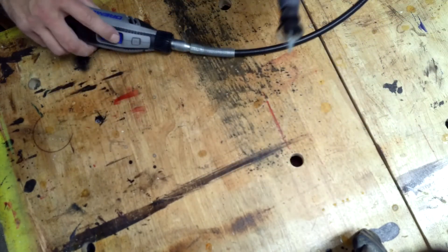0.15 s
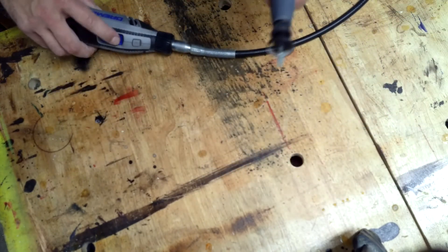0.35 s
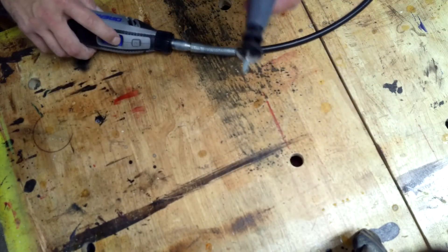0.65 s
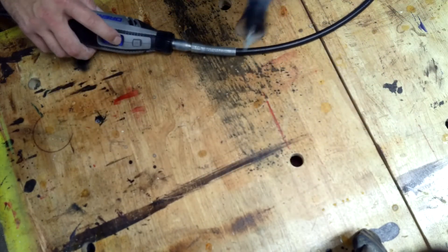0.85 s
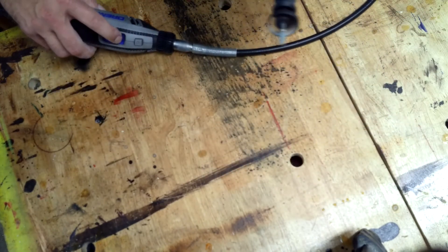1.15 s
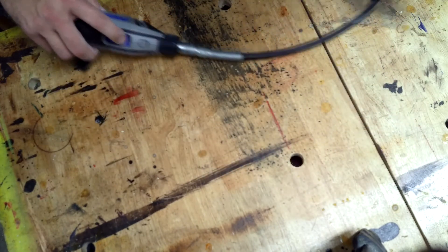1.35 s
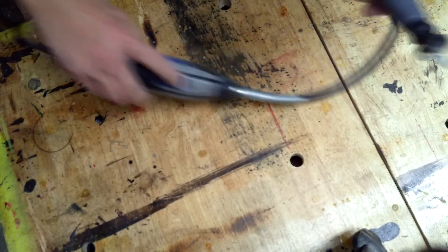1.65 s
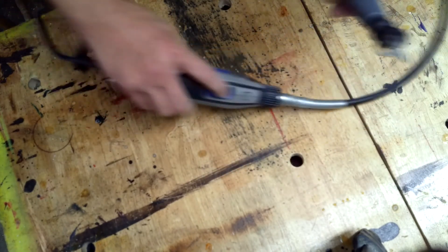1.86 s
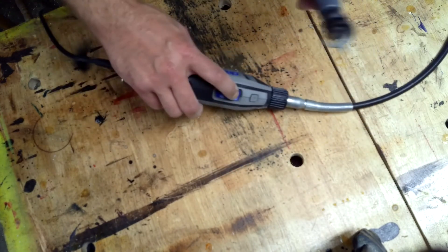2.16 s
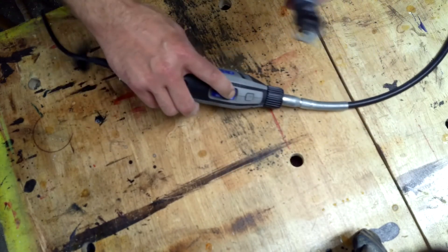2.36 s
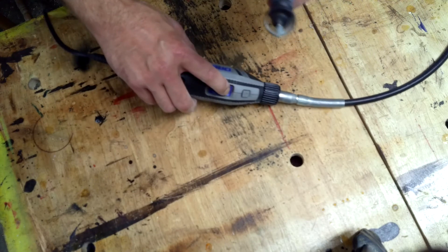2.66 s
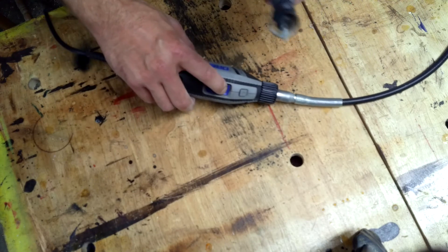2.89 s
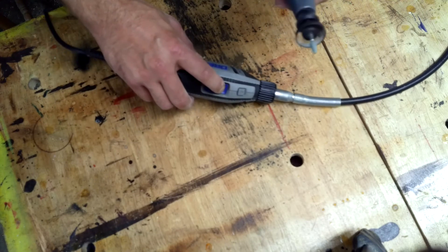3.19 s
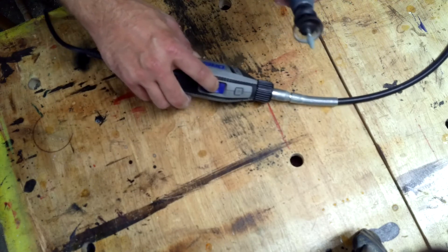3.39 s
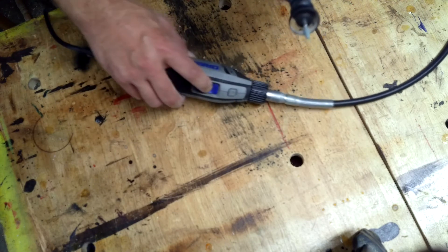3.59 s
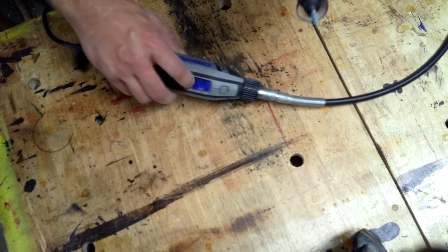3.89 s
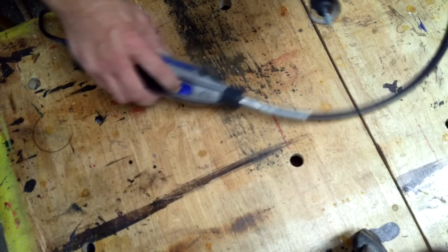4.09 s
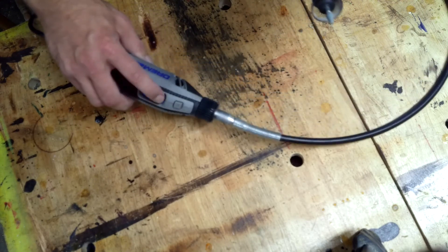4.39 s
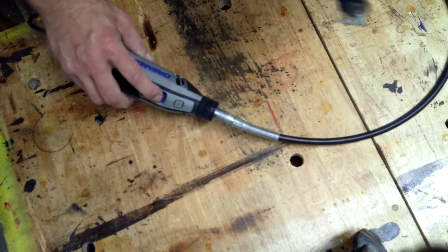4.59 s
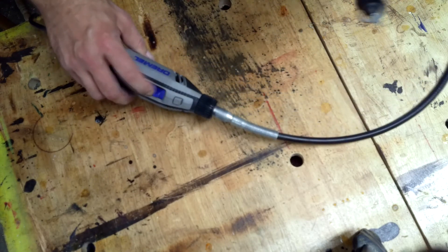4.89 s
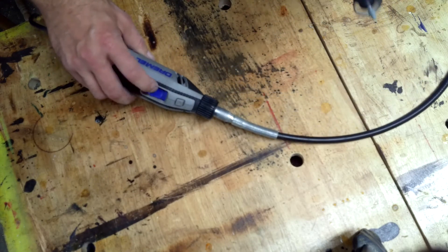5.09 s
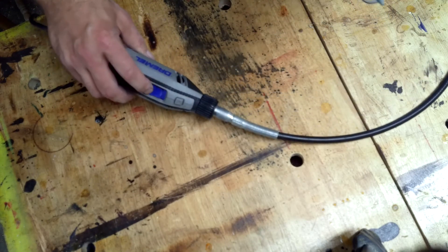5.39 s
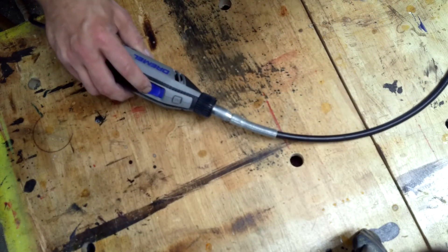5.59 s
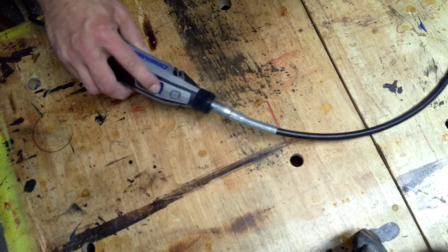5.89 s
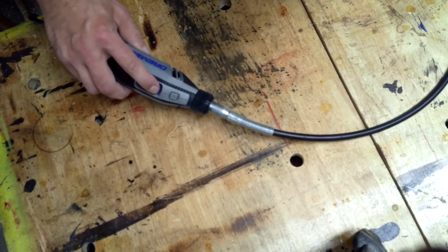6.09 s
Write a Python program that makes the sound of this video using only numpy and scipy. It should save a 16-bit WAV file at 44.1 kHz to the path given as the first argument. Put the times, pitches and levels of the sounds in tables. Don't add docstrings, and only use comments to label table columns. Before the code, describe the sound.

Close up in a small workshop, a little electric rotary tool spins up to a high, buzzing, hissing whine and holds steady. A sharp switch snap cuts it and the pitch slides down. A softer click restarts it for half a second, another snap lets it coast lower, and a last click sends it climbing to full speed again.

```python
import sys
import numpy as np
from scipy import signal
from scipy.fft import rfft, irfft
from scipy.io import wavfile
from scipy.ndimage import uniform_filter1d

SR = 44100
rng = np.random.default_rng(int(sys.argv[2]) if len(sys.argv) > 2 else 0)


def materialize(psi):
    bounded = np.clip(np.atleast_2d(psi).T, -1, 1)
    quanta = np.round(bounded * 32767).astype(np.int16)
    wavfile.write(sys.argv[1], SR, quanta)


def nominal_scale(level):
    x = np.asarray(level, float) / 20
    return 10 ** x


N = 275625
TIME = np.arange(N) / SR
FULL_HZ = 372


def rms_one(x):
    return x / np.sqrt(np.mean(x ** 2) + 1e-20)


def in_time(rows):
    s, *columns = np.transpose(rows)
    return [np.interp(TIME, s, column) for column in columns]


def at_hz(points, hz):
    point_hz, point_db = np.transpose(points)
    return np.interp(np.log(hz), np.log(point_hz), point_db)


def drift(rate_hz):
    r = np.exp(-80 * np.pi * rate_hz / SR)
    draws = rng.standard_normal(N // 40 + 2002)
    slow = signal.lfilter([1], [1, -2 * r, r * r], draws)[2000:]
    return np.interp(np.arange(N) / 40, np.arange(len(slow)), rms_one(slow))


def peak(x, hz, width_hz, db):
    r = np.exp(-np.pi * width_hz / SR)
    band_gain = (1 - r * r) / 2 * np.array([1, 0, -1])
    band = signal.lfilter(band_gain, [1, -2 * r * np.cos(2 * np.pi * hz / SR), r * r], x)
    return x + (nominal_scale(db) - 1) * band


# first_from_s, first_to_s, second_from_s, second_to_s
MOVES = (1.55, 1.9, 3.9, 4.3)


def posed(levels):
    one, two, three = levels
    return np.interp(TIME, MOVES, [one, two, two, three])


# on_s, pull_up_s, peak_hz, settled_hz, off_s (hz = shaft turns per second)
RUNS = [
    (-.22, .55, 385, 372.1, 3.32),
    (4.135, .427, 380.5, 377.5, 4.71),
    (5.726, .467, 380.5, 378, 6.3),
]
PULL_UP = [(0, 0), (.1, .033), (.2, .13), (.35, .33), (.5, .55), (.65, .755), (.78, .9), (.885, .987),
           (1, 1)]


def shaft_speed():
    friction_hz_per_s, drag_per_s = 150, .55
    settle_s, swing_s = .16, 1.0
    speed, rest_hz = np.zeros(N), friction_hz_per_s / drag_per_s
    for on_s, pull_s, peak_hz, settled_hz, off_s in RUNS:
        left_hz = np.interp(on_s, TIME, speed)
        gained = np.interp((TIME - on_s) / pull_s, *np.transpose(PULL_UP))
        rising = left_hz + (peak_hz - left_hz) * gained
        held_s = np.maximum(TIME - on_s - pull_s, 0)
        overshoot = np.exp(-held_s / settle_s) * np.cos(2 * np.pi * held_s / swing_s)
        driven = rising - (peak_hz - settled_hz) * (1 - overshoot)
        off_hz = np.interp(off_s, TIME, driven)
        coasting = (off_hz + rest_hz) * np.exp(-drag_per_s * (TIME - off_s)) - rest_hz
        speed = np.where(TIME < on_s, speed, np.where(TIME < off_s, driven, coasting))
    return uniform_filter1d(speed, size=900, mode="nearest")


def states(speed):
    slope = np.gradient(speed) * SR
    pulling = uniform_filter1d((slope > 100) * 1., size=1500)
    coasting = uniform_filter1d((slope < -100) * 1., size=1500)
    return pulling, coasting, np.interp(speed, (355, 367), [0, 1])


# start_s, stop_s
THROBBING = [
    (0, 3.32),
    (4.14, 4.4),
    (5.69, 6.3),
]


def current(speed):
    pulse_hz, lead_turns = 120, .07
    on = sum((TIME > start) & (TIME < stop) for start, stop in THROBBING)
    on = uniform_filter1d(on * 1., size=200)
    sharpness = on * (1.24 + 1.0 * (1 - speed / speed.max()))
    lumps = np.exp(sharpness * np.cos(2 * np.pi * (pulse_hz * TIME + lead_turns)))
    return lumps / np.i0(sharpness)


def shaft_angle(speed):
    hunted_hz = speed + .25 * drift(1.5)
    return 2 * np.pi * np.cumsum(hunted_hz) / SR + .028 * drift(14)


def tone(angle, order, waver_db):
    phase = rng.uniform(0, 2 * np.pi)
    return np.sqrt(2) * nominal_scale(waver_db * drift(18.5)) * np.sin(order * angle + phase)


# multiple, loss_when_coasting_db, then trim at full speed pose1_db, pose2_db, pose3_db
WHINE_LAW = [
    (5, -4, -0.2, -0.2, 0.5),
    (8, 15, -10, -2.5, -2.5),
    (10, -4, -0.5, -6, 8.5),
    (16, 11, -3, -2, 0.5),
    (24, 10, 3.5, -1.5, 4.5),
    (26, -9, -1, 2.5, -12),
    (3, 4, -19, -3.5, -19),
]
# pose1_db, pose2_db, pose3_db, coasting_loss_db per halving of speed
GLIDE_TRIM_DB = [
    (1.7, -2.5, -2.5, 5.5),
    (3, 4, 1, .1),
    (.1, 0.5, -2, 3.5),
    (-3, 10, -2, 32),
    (-9, -16, -4, 1),
    (3, -1.3, -4, 1),
    (-2, 7, 8, -6),
]
# pitch_hz, level_db
WHINE_COLOUR = [
    [(650, -59), (850, -43), (1100, -38), (1350, -29.5), (1520, -23.5), (1620, -30.5), (1740, -21),
     (1860, -32)],
    [(1400, -52), (1800, -40), (2050, -42.5), (2250, -31.5), (2450, -30.5), (2700, -35), (2850, -33),
     (2980, -33.5)],
    [(1200, -56), (1600, -36), (2000, -59), (2500, -42), (2900, -48), (3150, -31), (3450, -39),
     (3720, -41.5)],
    [(1800, -46), (2500, -35), (2750, -36), (3350, -35), (3900, -30.5), (4500, -34), (5200, -45),
     (5800, -37)],
    [(2600, -43), (3700, -38), (4300, -26), (5500, -71), (7000, -27), (8000, -50), (8930, -41.5)],
    [(3000, -64), (4500, -60), (6000, -52), (8000, -45), (9670, -40)],
    [(500, -81), (900, -86), (1115, -39.5)],
]
# time_s, bearing_load_db, bent_shaft_hum_db, vents_uncovered_db
HANDLING = [(.28, .1, -72, 5), (.38, 4.5, -52, 1.5), (.52, 2, -47.5, 2), (.82, 5, -47.5, -6),
            (1.3, 6.5, -50.5, 11), (1.48, -3.5, -54, -10), (1.7, 5.5, -57.5, -12), (1.92, -3.5, -54, 1.5),
            (2.15, -9, -60, -0.5), (2.36, -3.5, -52.5, 0), (2.6, -9, -62, -0.5), (2.85, -11, -58, 3.5),
            (3.3, -4, -62, 4.5), (4.55, -6, -47, -2.5), (4.68, -0.5, -46, 0), (6.12, -8, -51, -4),
            (6.2, -1, -43, 1)]


def whine_levels(speed):
    _, coasting, running = states(speed)
    load_db, _, vents_db = in_time(HANDLING)
    hand_db = {5: load_db, 8: vents_db}
    for law, glide, colour in zip(WHINE_LAW, GLIDE_TRIM_DB, WHINE_COLOUR):
        order, coast_db, *trim_db = law
        *glide_db, fade_db = glide
        order = round(order)
        steady_db = posed(trim_db) + hand_db.get(order, 0)
        gliding_db = posed(glide_db) + 2.2 * drift(13.5) * coasting
        lost_db = (coast_db + fade_db * np.log2(FULL_HZ / speed)) * coasting
        trimmed_db = running * steady_db + (1 - running) * gliding_db
        yield order, at_hz(colour, order * speed) - lost_db + trimmed_db


def shaft_hum(speed, angle):
    hum_db = in_time(HANDLING)[1] - 22 * (1 - states(speed)[2])
    return nominal_scale(hum_db) * tone(angle, order=1, waver_db=2.3)


# pose1_db, pose2_db, pose3_db
FAN_COAST_DB = (.1, .1, -4)


def whines(speed, angle, roar_db, lumps):
    slack = 1 - speed / speed.max()
    pulled = uniform_filter1d((np.gradient(speed) > 0) * 1., size=800)
    throb_depth = {8: .9, 16: .2 + slack, 24: 1.2 * slack}
    out = np.zeros(N)
    for order, level_db in whine_levels(speed):
        if order == 26:
            fan_db = roar_db + posed(FAN_COAST_DB) - 19 + 30 * np.minimum(slack, .3)
            fan_db = fan_db - 60 * np.maximum(slack - .48, 0) - 14 * pulled
            level_db = np.maximum(level_db, fan_db)
        line = nominal_scale(level_db) * lumps ** throb_depth.get(order, 0) * tone(angle, order, waver_db=2.2)
        if order in throb_depth:
            line = peak(peak(line, 2620, 400, 8), 3150, 300, -13)
        out = out + line
    return out


# pitch_hz, level_db
SLOT_COLOUR = [(2500, -56), (3200, -53), (3800, -38), (4500, -36), (5200, -67), (9000, -44), (12000, -47)]
# pose1_db, pose2_db, pose3_db
BUZZ_DB = (-29, -40, -50)


def slot_buzz(speed, angle, lumps):
    slack = 1 - speed / speed.max()
    drive = np.clip(uniform_filter1d(np.abs(lumps - 1), size=2000), .12, 1) * lumps ** slack
    top = nominal_scale(at_hz(SLOT_COLOUR, 32 * speed)) * drive * tone(angle, order=32, waver_db=0.5)
    buzz = nominal_scale(posed(BUZZ_DB)) * states(speed)[2] * (lumps - 1) * tone(angle, order=8, waver_db=0.0)
    ring = peak(buzz, 2720, 560, 4.83) - buzz
    return top + 2 * ring


FAINT_ORDERS = (3, 4.08, 6, 6.9, 7, 9, 10.92, 12, 13, 14, 15, 17, 20, 23, 29)
FAINT = [-23.5, -21.5, -23, -18.5, -19, -18, -24.5, -21, -24.5, -20, -24, -23, -23.5, -20, -24]
# pitch_hz, level_db per Hz
AIR = [(15, -52), (25, -25), (55, -25.5), (253, -23), (368, -22), (410, -19), (522, -12.5), (848, -10),
       (1140, -10.5), (1620, -8), (2920, -2.5), (4150, -5.5), (5880, -5.5), (9540, -9), (15500, -24.5)]


def faint_tones(speed, angle, roar_db):
    out, coasting = np.zeros(N), states(speed)[1]
    for order, level_db in zip(FAINT_ORDERS, FAINT):
        radiated_db = at_hz(AIR, order * speed) - at_hz(AIR, order * speed.max())
        level_db = roar_db + level_db + np.minimum(radiated_db, 9) + 0.5 * coasting + 0.33 * drift(8.6)
        out = out + nominal_scale(level_db) * tone(angle, order, waver_db=4.5)
    return out


def tones(speed, roar_db, lumps):
    angle = shaft_angle(speed)
    out = shaft_hum(speed, angle) + whines(speed, angle, roar_db, lumps)
    return out + slot_buzz(speed, angle, lumps) + faint_tones(speed, angle, roar_db)


# pose1_db, pose2_db, pose3_db
NOISE_DB = [
    (-31.5, -29, -27),
    (-24, -24, -23),
    (-23.5, -22.5, -23),
    (-36.5, -36.5, -38),
]
# loss_db per halving of speed, pull_up_gain_db, floor_db
NOISE_LAW = [
    (12.5, 0, -38.5),
    (10.5, 0.5, -42),
    (12, 0.2, -39),
    (9, 2.5, -72),
]


def motor_levels(speed):
    halvings, pulling = np.log2(FULL_HZ / speed), states(speed)[0]
    levels_db = []
    for full_db, (loss_db, pull_db, floor_db) in zip(NOISE_DB, NOISE_LAW):
        layer_db = posed(full_db) - loss_db * halvings + pull_db * pulling
        levels_db.append(20 * np.log10(np.hypot(nominal_scale(layer_db), nominal_scale(floor_db))))
    return levels_db


# pitch_hz, width_hz, lift_db
HOUSING = [(548, 10, 4), (1202, 180, 5), (1673, 70, 0.5), (2590, 120, 2.5), (2720, 84, 0.5),
           (6080, 1100, 1.5), (8870, 120, 2), (4250, 330, -3.5), (4760, 440, -2.5)]


def air(speed, levels_db, lumps):
    edges, out = 25 * 2 ** np.arange(0, 9.4, 1 / 3), 0
    centres = np.log([700, 2600, 6400, 11500])   # Hz, of the four noise layers
    change_db = [level - np.median(level) for level in levels_db]
    white, together = rng.standard_normal((2, N)), drift(13.4)
    for k, (low, high) in enumerate(zip(edges, edges[1:])):
        hz = np.sqrt(low * high)
        place = np.interp(np.log(hz), centres, np.arange(4))
        follow_db = sum(max(1 - abs(place - j), 0) * change_db[j] for j in range(4))
        follow_db = follow_db * np.clip(np.log2(hz / 60) / 2.1, .2, 1)
        flicker_db = .5 * together + (0.24 + hz / 12000) * drift(16.0) + 1.11 * drift(1.0)
        third_octave = signal.butter(2, [low, high], "band", fs=SR, output="sos")
        band = signal.sosfilt(third_octave, white[k % 2])
        out = out + nominal_scale(at_hz(AIR, hz) + follow_db + flicker_db) * band
    for hz, width_hz, db in HOUSING:
        out = peak(out, hz, width_hz, db)
    sparks = 1 + 0.28 * (1 - speed / speed.max()) * (lumps - 1)
    return nominal_scale(-23.0) * rms_one(out) * sparks


# time_s, peak_db, ring_hz, lower_ring_hz, lower_ring_db
SNAPS = [
    (3.319, 1.5, 6000, 3170, -8),
    (4.123, -4.5, 6300, 3670, -18),
    (4.732, 1, 6900, 3600, -9),
    (5.669, -1.5, 6800, 4080, -12),
]


def switch():
    out, t = np.zeros(N), np.arange(1500) / SR
    low_pass = signal.butter(4, 8800, fs=SR, output="sos")
    high_pass = signal.butter(1, 350, "high", fs=SR, output="sos")
    for s, db, high_hz, low_hz, low_db in SNAPS:
        contacts = rng.standard_normal(1500) * np.exp(-t / 0.0017) * np.clip(t / 0.00077, 0, 1)
        high_ring = peak(contacts, high_hz, 1000, 17.0)
        low_ring = nominal_scale(low_db + 23.0) * (peak(contacts, low_hz, 1300, 9.2) - contacts)
        snap = signal.sosfilt(low_pass, 0.16 * contacts + high_ring + low_ring) + 0.08 * contacts
        snap = signal.sosfilt(high_pass, snap)
        at = round(s * SR)
        out[at:at + 1500] += nominal_scale(db) * snap / np.abs(snap).max()
    return out


def workshop(x):
    t60_s = .3
    t = np.arange(int(.5 * SR)) / SR
    tail = rng.standard_normal(len(t)) * nominal_scale(-60 * t / t60_s) * (t > .004)
    tail = signal.lfilter([1], [1, -.4], tail)
    return signal.fftconvolve(x, tail / np.sqrt(np.sum(tail ** 2)))[:N]


# time_s, crank_hz (turns per second), level_db
ENGINE = [(0, 30, -53), (.46, 30, -51), (.93, 32.7, -54.5), (1.47, 34, -52), (2.1, 34.4, -54),
          (2.29, 29.4, -63), (2.49, 25, -47), (2.78, 29.7, -64), (2.93, 20, -48)]


def engine():
    crank, level_db = in_time(ENGINE)
    fade_db = 85 * np.maximum(TIME - ENGINE[-1][0], 0)
    third_db = -51.5 - 4 * np.maximum(32 - crank, 0)
    angle = 2 * np.pi * np.cumsum(crank) / SR
    firing = nominal_scale(level_db) * np.sin(2 * angle) + nominal_scale(third_db) * np.sin(3 * angle)
    return np.sqrt(2) * nominal_scale(-fade_db) * firing


# time_s, centre_hz
FLECKS = [(.356, 4750), (.356, 7600), (.403, 10300), (.89, 6300), (1.169, 7600), (1.216, 6950),
          (1.61, 5750), (1.843, 7300), (1.866, 8600), (1.866, 10800), (2.353, 4700), (2.446, 8600),
          (2.887, 6300), (2.911, 5000), (2.911, 10800), (3.398, 8300)]
# pitch_hz, level_db
FLECK_COLOUR = [(4700, -36), (5700, -33.5), (8600, -34.5), (11100, -41)]


def side_flecks():
    out, hz = np.zeros(N), np.arange(1025) * SR / 2048
    for s, centre_hz in FLECKS:
        in_band = np.abs(hz / centre_hz - 1) < .2 / 2
        band = rms_one(irfft(rfft(rng.standard_normal(2048)) * in_band))
        at = round(s * SR) - 1024
        out[at:at + 2048] += nominal_scale(at_hz(FLECK_COLOUR, centre_hz)) * band * np.kaiser(2048, 5)
    return out * [[1], [-1]]


def scene():
    speed = shaft_speed()
    levels_db, lumps = motor_levels(speed), current(speed)
    near = tones(speed, levels_db[1], lumps) + switch()
    mono = near + air(speed, levels_db, lumps) + nominal_scale(-13) * workshop(near) + engine()
    return np.array([mono, mono])


def top_cut(x):
    return signal.sosfilt(signal.butter(12, 15640, fs=SR, output="sos"), x)


def record(dry):
    limited = .5 * np.tanh(dry / .5)
    cut = signal.sosfilt(signal.cheby2(12, 60, 15800, fs=SR, output="sos"), limited)
    return top_cut(cut + side_flecks())


dry = scene()
out = record(dry)
materialize(out)
```